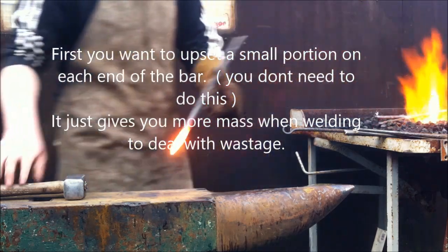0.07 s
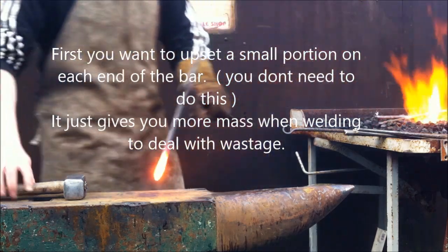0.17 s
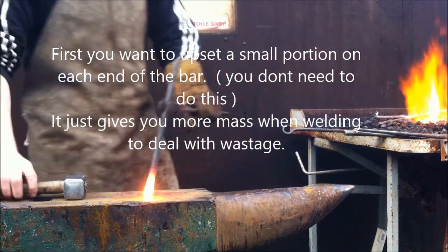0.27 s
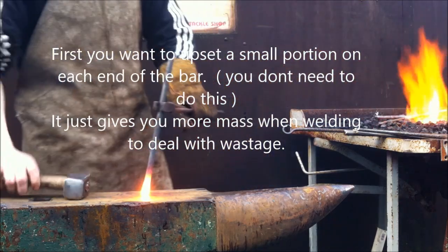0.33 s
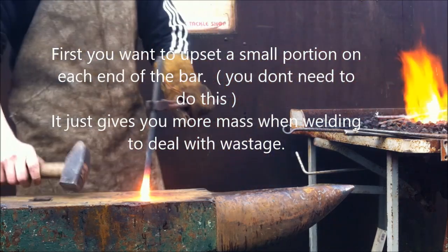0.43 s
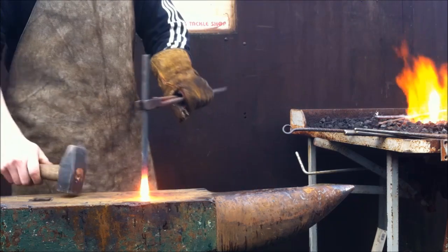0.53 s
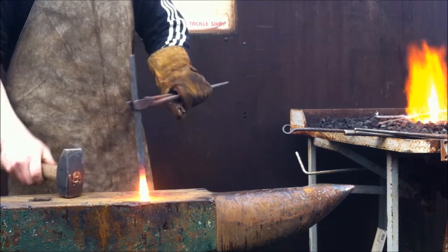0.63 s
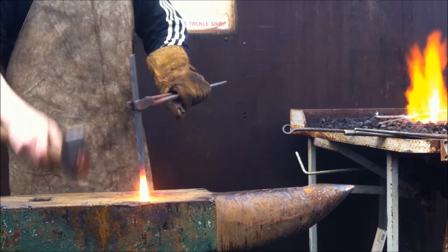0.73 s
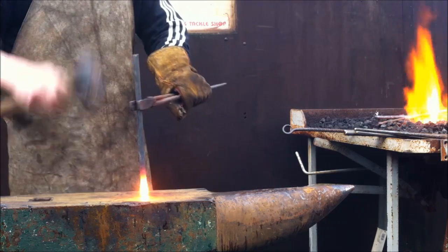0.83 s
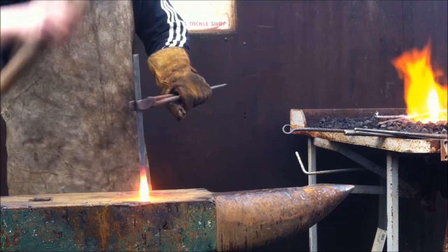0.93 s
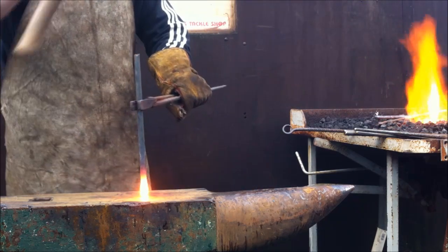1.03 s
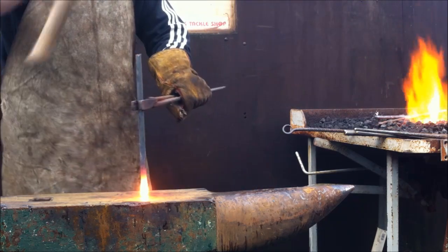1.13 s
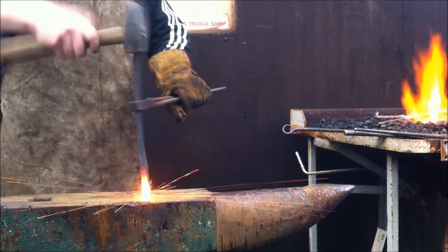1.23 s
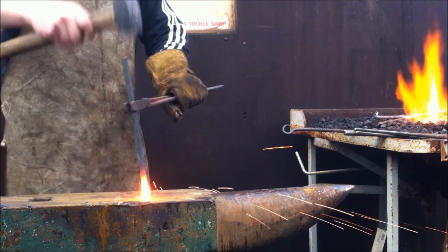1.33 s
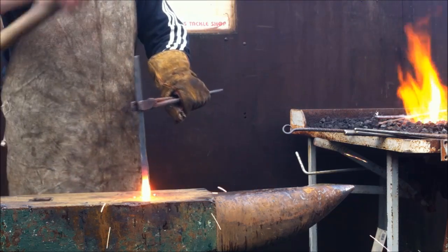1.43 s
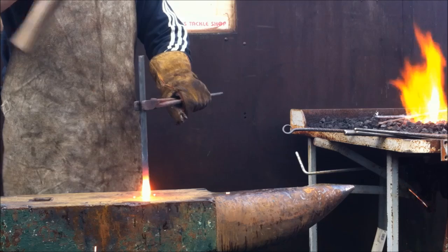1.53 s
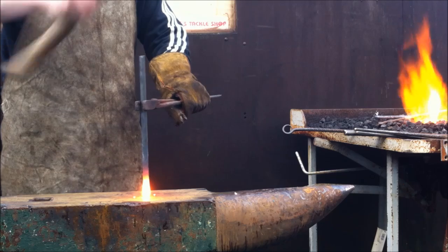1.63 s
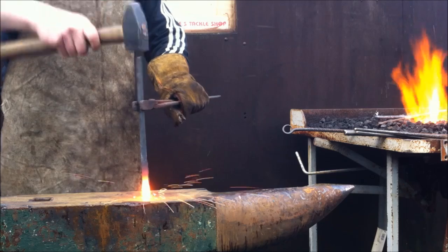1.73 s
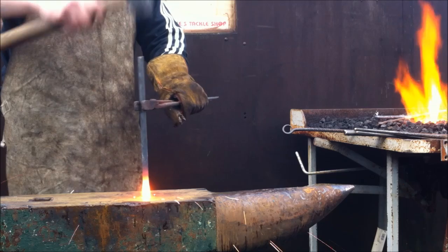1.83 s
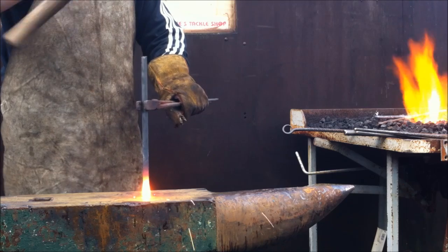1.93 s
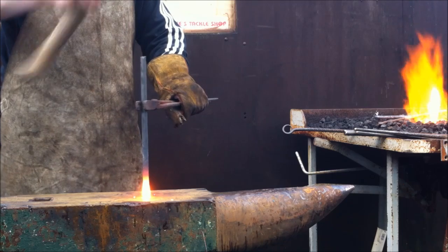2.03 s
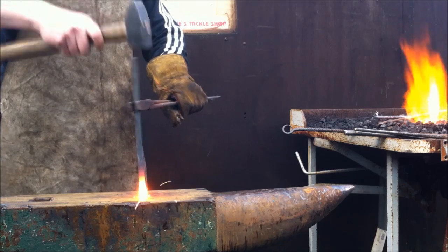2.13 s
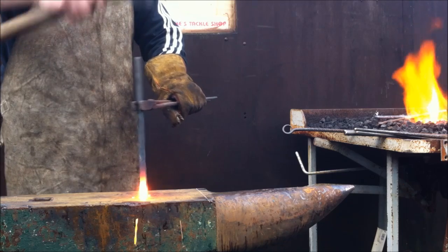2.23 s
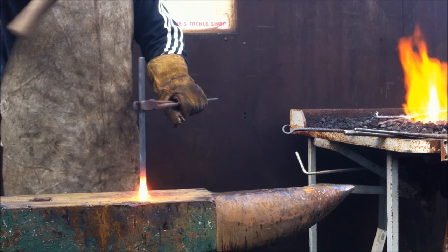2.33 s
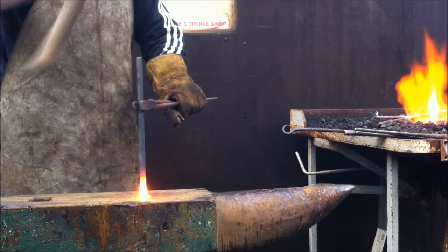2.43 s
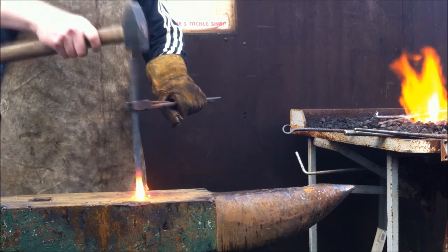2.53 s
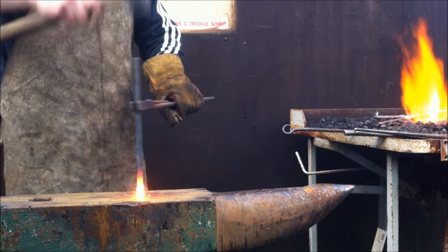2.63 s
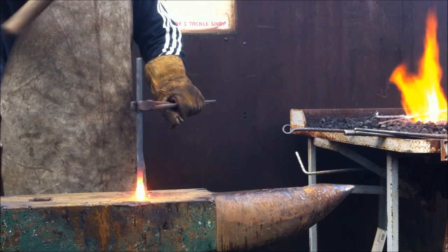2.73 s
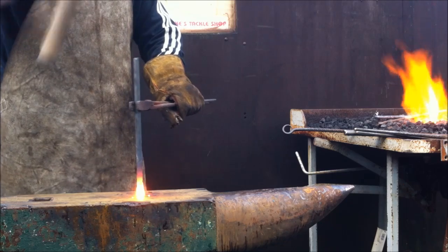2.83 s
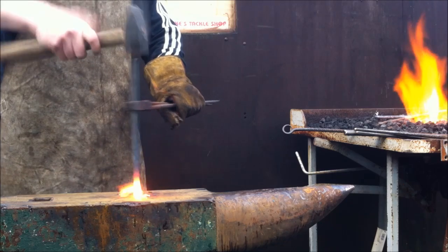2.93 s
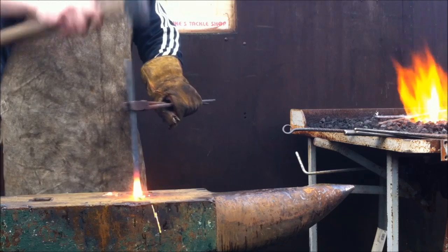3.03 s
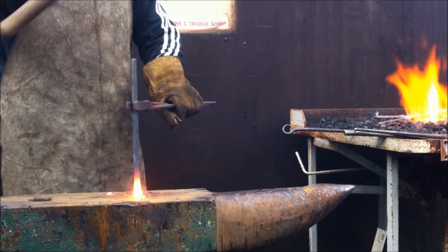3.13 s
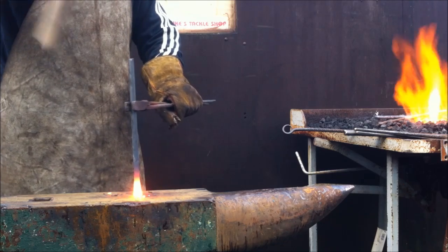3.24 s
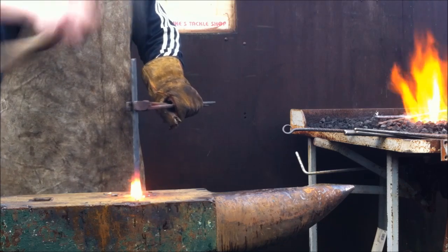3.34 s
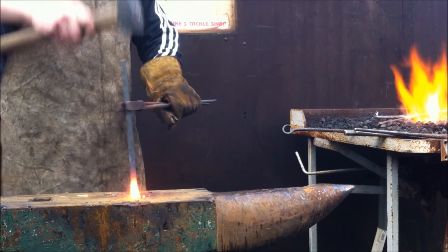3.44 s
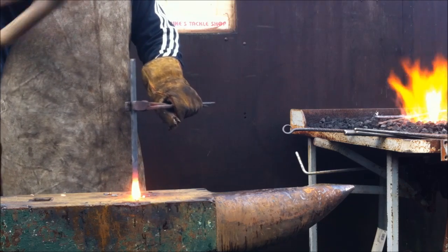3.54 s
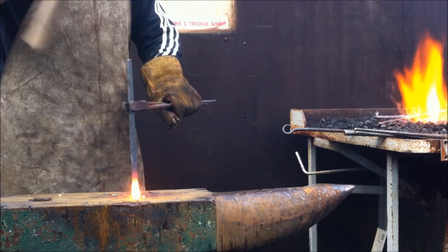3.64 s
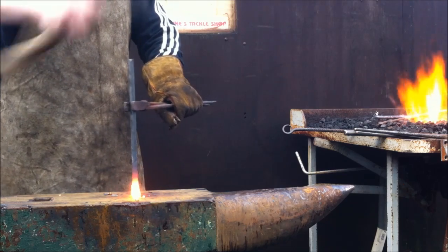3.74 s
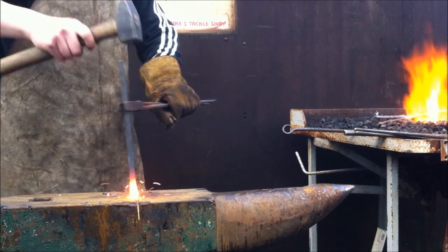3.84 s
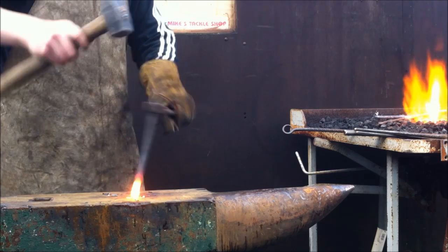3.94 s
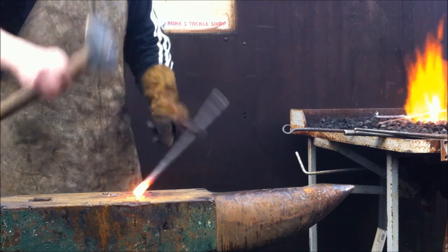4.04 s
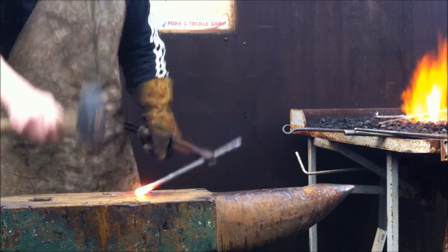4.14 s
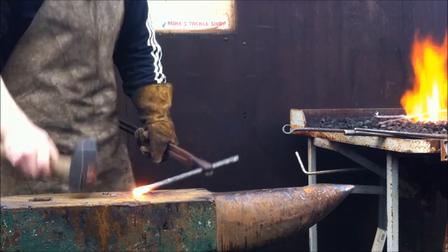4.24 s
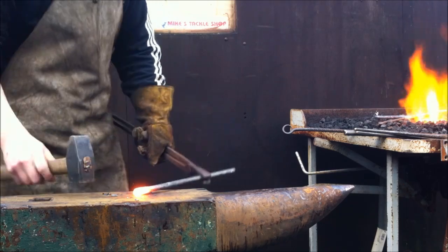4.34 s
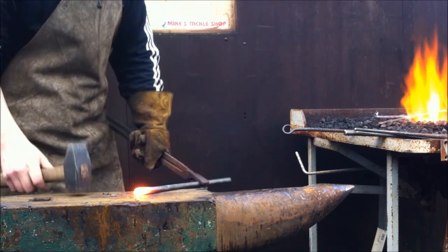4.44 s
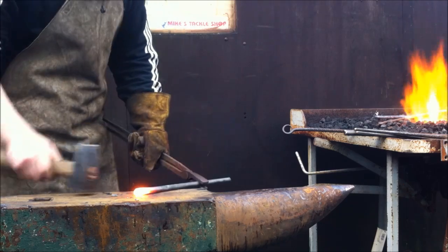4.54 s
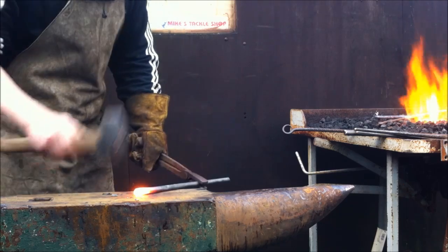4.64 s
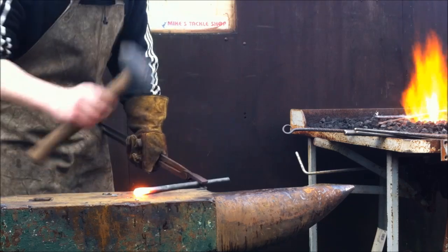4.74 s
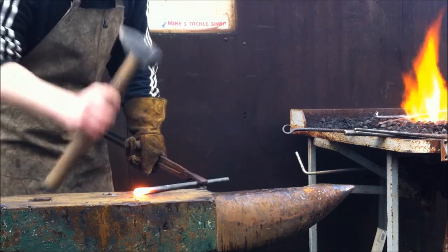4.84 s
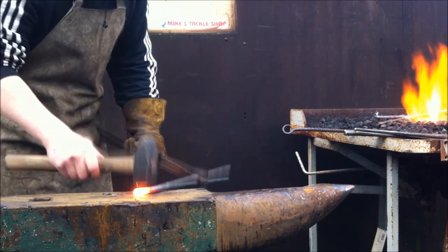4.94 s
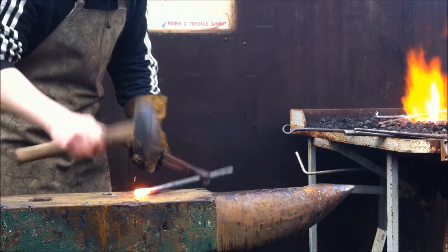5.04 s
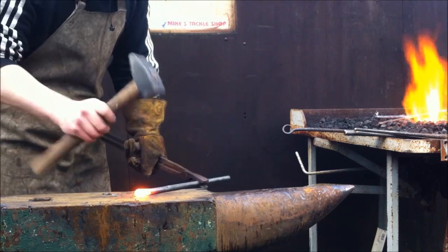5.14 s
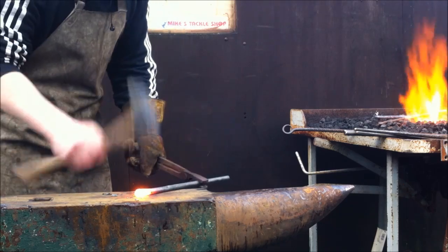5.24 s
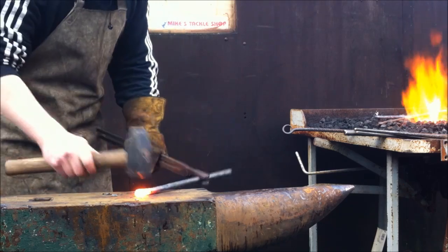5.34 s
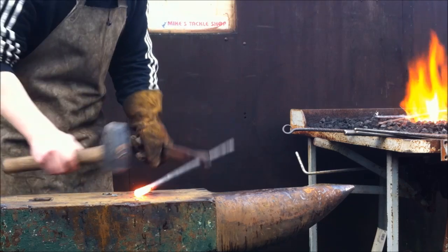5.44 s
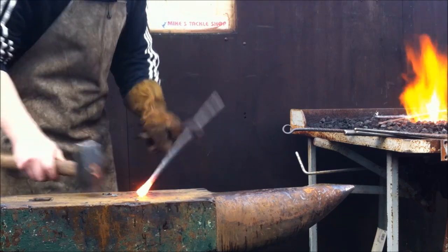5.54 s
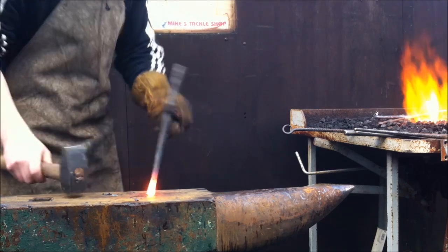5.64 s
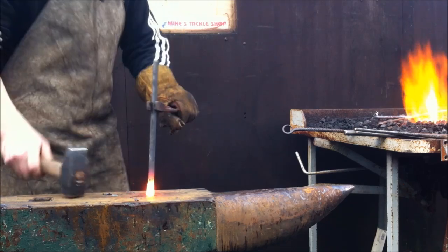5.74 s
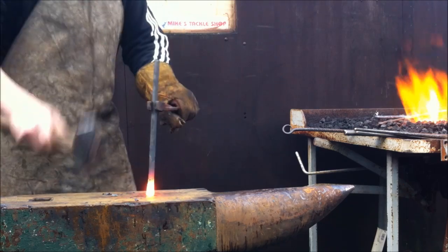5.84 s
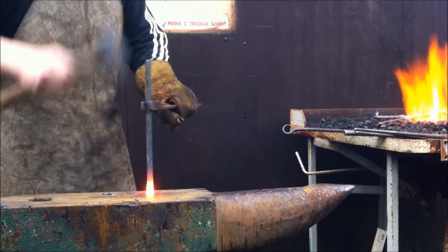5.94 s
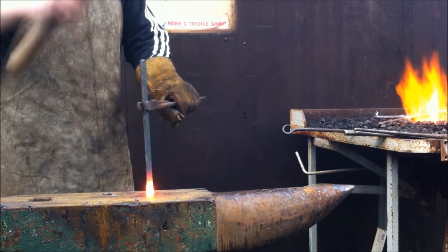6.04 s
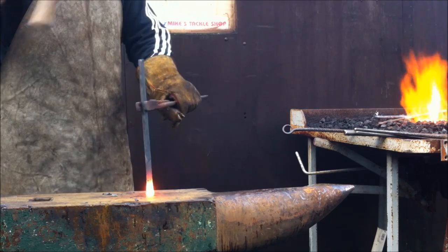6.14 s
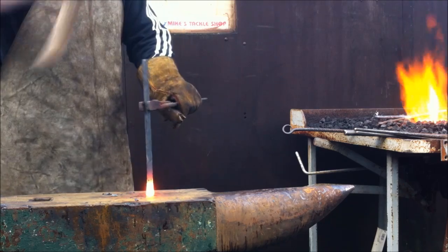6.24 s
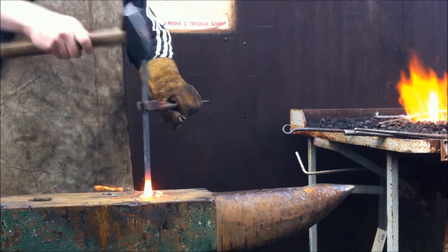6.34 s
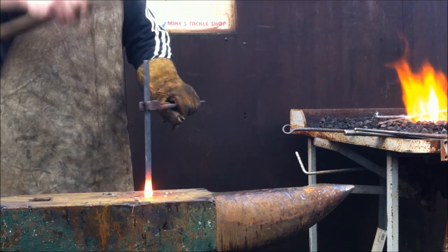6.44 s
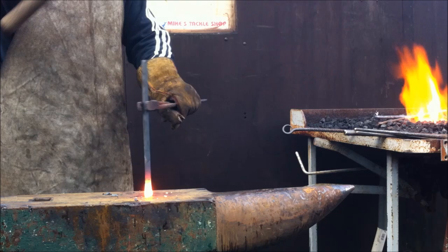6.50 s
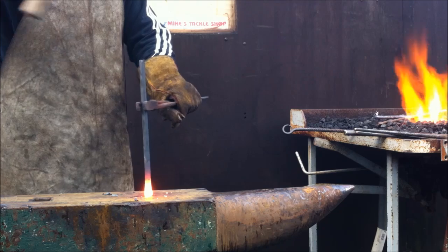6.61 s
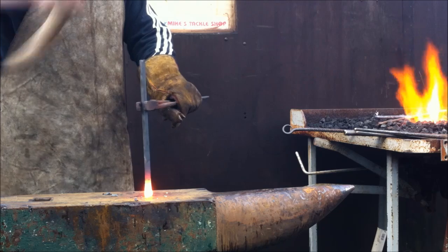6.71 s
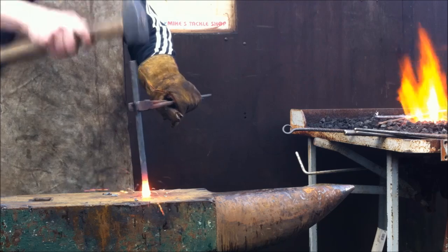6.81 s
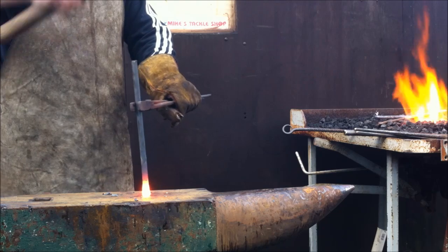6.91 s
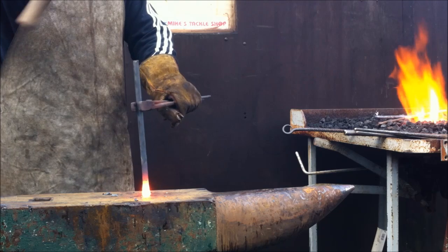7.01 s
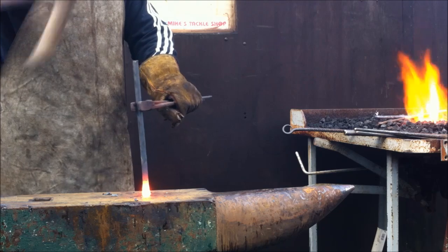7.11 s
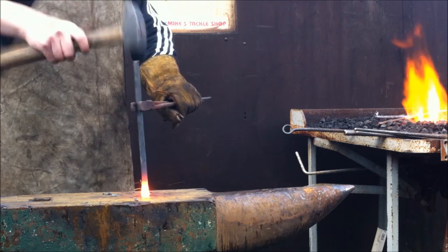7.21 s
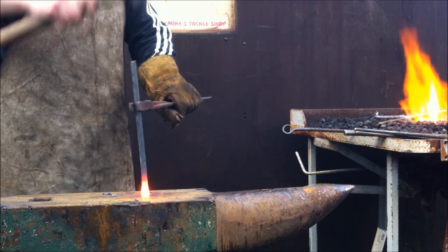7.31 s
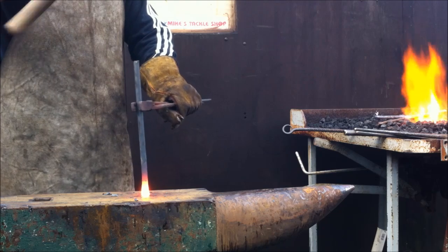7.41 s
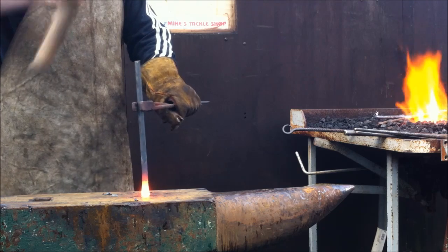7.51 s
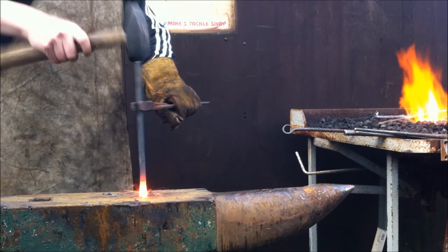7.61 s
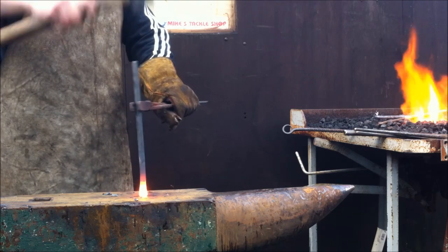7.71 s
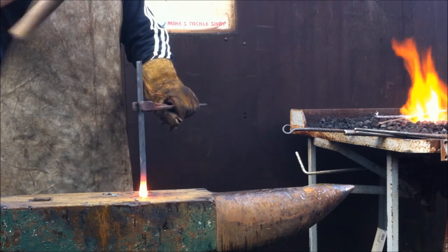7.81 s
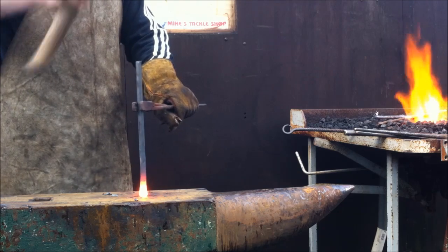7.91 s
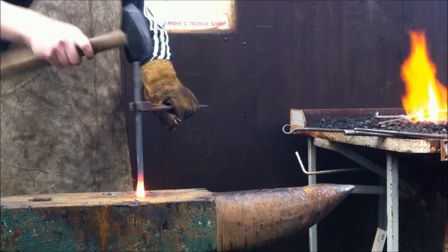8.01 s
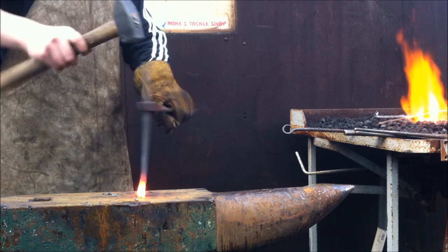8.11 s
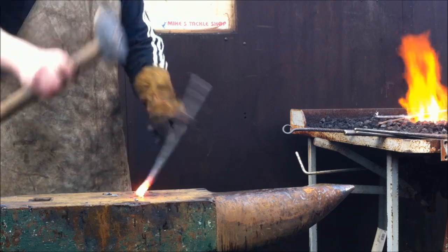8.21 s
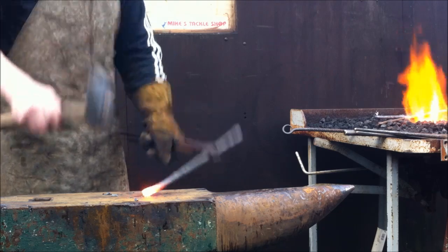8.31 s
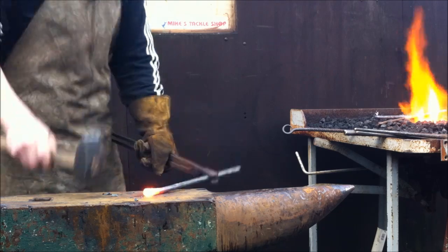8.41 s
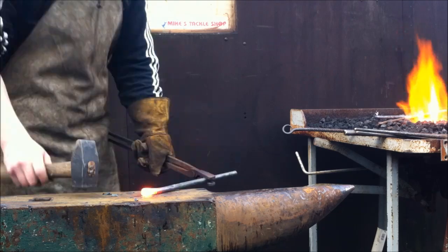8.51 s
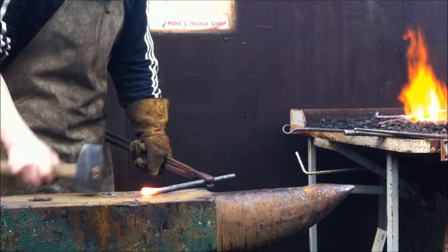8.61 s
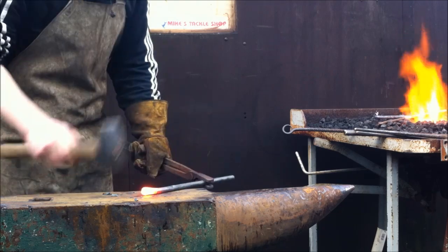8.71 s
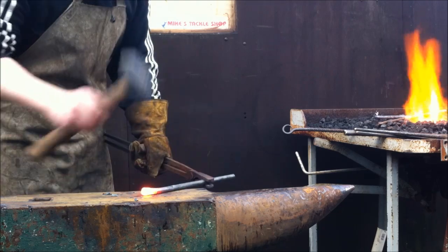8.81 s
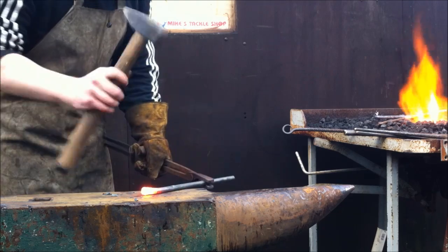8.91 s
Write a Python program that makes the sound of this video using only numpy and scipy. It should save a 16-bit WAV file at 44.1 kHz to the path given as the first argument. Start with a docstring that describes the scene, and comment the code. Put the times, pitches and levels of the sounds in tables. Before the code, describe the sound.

Sharp metallic hammer blows land on a hot steel bar, a little over two a second, in two runs with short ringing anvil taps and bounces before, between and after. The microphone is close to the anvil in an outdoor forge, where the fire roars softly, a blower hums and an apron faintly rustles. During the second run, the far wash of a road grows as a vehicle nears with a brief drone and whine.

```python
"""An open-air forge, one microphone close to the anvil, a road in the distance.
The fire roars softly under its blower's hum, and the smith's apron rustles. The hammer drops on the bare
anvil, bounces and rings; from 1.4 s heavy blows crack on the glowing end of a steel bar to upset it,
with more bounces between the runs. From about 7 s a motor vehicle seems to draw near, its road noise
swelling while the engine's tones rise and fade. Two last taps ring on the anvil."""
import sys
import numpy as np
from scipy import signal
from scipy.fft import rfft, irfft
from scipy.io import wavfile
from scipy.ndimage import uniform_filter1d

SR = 44100
rng = np.random.default_rng(int(sys.argv[2]) if len(sys.argv) > 2 else 0)


def pcm_store(signal):
    """Save signal as 16-bit PCM."""
    levels = np.round(np.clip(np.atleast_2d(signal), -1, 1) * 32767)
    wavfile.write(sys.argv[1], SR, levels.astype(np.int16).T)


N = 395180

# fire and air in the hearth: (frequency [Hz], density [dB])
FIRE_COLOUR = [(18, -108), (30, -54), (70, -29), (153, -8.5), (266, -4.5), (295, -4), (328, -10.5),
               (394, -5.5), (740, -18.5), (866, -4.5), (937, -22.5), (1280, -14.5), (3770, -34.5),
               (9460, -30.5), (16000, -35.5)]
# the blower's hum: (frequency [Hz], rms level [dB])
BLOWER_TONES = [(296, -64.5), (393, -62), (792, -59), (879, -50)]
# road noise, far or near: (frequency [Hz], density [dB])
ROAD_COLOUR = [(24, -52), (40, -38), (184, -3), (319, -7), (490, 3), (622, -1.5), (1030, -0.5), (1240, -10),
               (2310, -13), (2540, -16.5), (2800, -15), (3390, -24.5), (3910, -25), (12000, -52.5),
               (15600, -78.5), (22000, -120)]
# the microphone's own hiss: (frequency [Hz], density [dB])
MIC_COLOUR = [(20, 23), (100, 9.5), (3000, 2), (7000, -7), (10000, 8), (16000, -6)]
# the smith shifts at the anvil: (middle [s], half length [s], level [dB])
RUSTLES = [(0.152, 0.21, -54), (.38, 0.039, -55.5), (4.782, 0.025, -49), (6.097, 0.052, -51.5)]
# cloth on cloth: (frequency [Hz], density [dB])
CLOTH_COLOUR = [(100, -20), (1500, -3), (3500, 1.5), (8000, -4.5), (14000, -2), (16000, -1)]

# strokes on the bare anvil: (time [s], force [dB], dullness [dB], ring [dB], hardness [dB/octave])
ANVIL_TAPS = [(.4487, -30, 14.5, 11, -2), (.5234, -15.5, 5, -14, 1), (.7056, 3.5, 5, -4, 4),
              (.7667, -6.5, -4.2, 4, -2), (.8087, -11.5, 1.5, -20, 6), (4.4368, 5.5, 0, -2, 2.5),
              (4.6035, 8, -0.6, 3, -6.5), (5.6959, 11.5, 0, -6.5, 11.5), (5.8013, 4.5, -2.5, -7, 7),
              (5.8714, 1, -2.5, -3, -0.5), (8.6333, -0.6, -7, -2.5, .5), (8.7721, 4, 3, -3, -5)]
# contact with the bare anvil: (frequency [Hz], density [dB])
TAP_COLOUR = [(40, -31), (250, -23), (500, -20.5), (1000, 4), (1600, 2), (2400, 2), (4000, -1),
              (5700, -1.5), (7200, -14), (11000, -22), (16000, -52)]
# the anvil ringing freely: (frequency [Hz], relative level [dB], t60 [s])
ANVIL_MODES = [(478, -22, .14), (1040, -17, .07), (1076, -22, .2), (1253, -24, .22), (2031, -21, .2),
               (2155, -20, .11), (2293, -9, .27), (2398, -9, .19), (2660, -23, .22), (3248, -16, .17),
               (3575, -19, .17), (3960, -20, .18), (4028, -19, .16), (5022, -15, .17), (5760, -27, .18),
               (6447, -23, .17), (8990, -38, .2), (13780, -30, .1), (14275, -26, .11)]
# borders between five registers, thud, knock, clang, ping and crack: (frequency [Hz])
REGISTER_EDGES = [800, 1450, 2900, 4400]
# the anvil's answer, a row a register: (base level [dB], per force [dB/dB], per dullness [dB/dB])
ANVIL_RESPONSE = [(-46.5, .9, 0.56), (-37, 0.65, 0.81), (-32, 0.96, -0.24), (-34, 0.99, -0.69),
                  (-38.5, 1.2, -0.83)]
# hard surfaces near the anvil: (delay [s], relative level [dB])
NEAR_ECHOES = [(.0085, -8), (0.0104, -18), (0.012, -10), (0.0199, -66), (0.0335, -33)]
# the shelter's reverberation: (frequency [Hz], t60 [s])
SHELTER_DECAY = [(200, 0.22), (1000, 0.31), (3000, 0.23), (7000, 0.25), (14000, 0.22), (16000, 0.16)]

# strokes on the hot bar: (time [s], force [dB], dullness [dB], ring [dB], hardness [dB/octave])
BAR_BLOWS = [(1.3935, -1.4, -4.5, -13, -2), (1.8559, -1.5, -2.5, -5.5, -1.5), (2.269, 0.6, -3.5, 2.5, -1),
             (2.6797, 2.5, -0.6, -0.5, -3.5), (3.0991, 2, -1, 1.5, -0.5), (3.5259, 2.5, -1.2, 2, -0.5),
             (3.9344, 3, -0.6, -2, -1), (5.1161, -3.3, 2.5, 4, 0), (5.4619, -3, 6, -0.5, 4),
             (6.4848, -3.5, -1, -0.5, -4.5), (6.9314, 2.5, -0.5, 2, 0), (7.3545, 1.5, 1, 1, -2.5),
             (7.7602, 1.2, 0.5, 1, -3.5), (8.1582, 1.2, 1.4, 1, -2)]
# contact with the bar: (frequency [Hz], density [dB])
BLOW_COLOUR = [(40, -31), (140, -19), (280, -4.5), (800, -2.5), (1550, -1.5), (2200, 8.5), (3000, 2.5),
               (3700, 0.5), (4500, 2), (8000, 2), (14000, 3), (16000, -2.5)]
# bar, hammer and anvil struck together: (frequency [Hz], relative level [dB], t60 [s])
BAR_MODES = [(310, -23, .06), (430, -29, .12), (560, -24, .08), (725, -19, .06), (1073, -17, .2),
             (1130, -22, .08), (1333, -30, .15), (1925, -22, .06), (2293, -27, .25), (2395, -23, .13),
             (2665, -26, .15), (3210, -24, .14), (3383, -18, .13), (3560, -14, .06), (3800, -14, .07),
             (3970, -23, .13), (5022, -22, .11), (5350, -19, .06), (6500, -26, .16), (6814, -26, .17),
             (7505, -26, .14), (9500, -29, .15), (13525, -30, .13), (14274, -28, .16)]
# the bar's answer, a row a register: (base level [dB], per force [dB/dB], per dullness [dB/dB])
BAR_RESPONSE = [(-32, 1.38, 0.3), (-31.5, 1.4, 1.5), (-30, 0.1, -.35), (-26, 1.32, -1), (-21, 0.71, 0.21)]

# the vehicle's drone and whine: (frequency [Hz], peak time [s], peak level [dB], rise [dB/s],
# fall [dB/s], pitch waver [fraction], flutter [dB])
ENGINE_TONES = [(105, 7.38, -54, 14, 12, .022, 2), (592, 7.78, -39, 9, 14, 0.0062, 1)]


def amp(db):
    """Decibels to gain."""
    return 10 ** (np.asarray(db) / 20)


def unit(x):
    """Scales to rms 1."""
    return x / np.sqrt(np.mean(x ** 2) + 1e-20)


def read(points, hz):
    """Reads a curve on a log-frequency axis."""
    f, value = np.transpose(points)
    return np.interp(np.log(hz + 1), np.log(f + 1), value)


def hiss(colour, size):
    """Noise of a given spectrum, rms 1."""
    gain = amp(read(colour, np.fft.rfftfreq(size, 1 / SR)))
    return unit(irfft(rfft(rng.standard_normal(size)) * gain, size))


def drift(rate_hz):
    """Slow random wander, rms 1."""
    rolloff = 1 + (np.fft.rfftfreq(N, 1 / SR) / rate_hz) ** 4
    return unit(irfft(rfft(rng.standard_normal(N)) / rolloff, N))


def tone(hz, db, waver, flutter_db):
    """A machine's tone, unsteady in pitch and level."""
    turns = np.cumsum(hz * (1 + waver * drift(5.0))) / SR
    return np.sqrt(2) * amp(db + flutter_db * drift(3.9)) * np.sin(2 * np.pi * turns)


def roar(colour, tilt, patchy_db):
    """Turbulent noise with drifting patches; tilt [dB/octave], one value a sample, acts above 1 kHz."""
    hz, t, spectra = signal.stft(hiss(colour, N), SR, nperseg=1024, noverlap=768)
    patches = uniform_filter1d(rng.standard_normal(spectra.shape), size=12, axis=0)
    patches = unit(uniform_filter1d(patches, size=12, axis=1))
    octaves = np.log2(np.maximum(hz / 1000, 1))[:, None]
    gain_db = patchy_db * patches + octaves * np.interp(t * SR, np.arange(N), tilt)
    return signal.istft(spectra * amp(gain_db), SR, nperseg=1024, noverlap=768)[1][:N]


def fire():
    """Air through the fire makes a soft, even roar."""
    return amp(-47.5) * roar(FIRE_COLOUR, tilt=np.zeros(N), patchy_db=.6)


def blower():
    """The blower feeding the fire hums on a few nearly steady tones."""
    return sum(tone(hz, db, waver=0.00136, flutter_db=2.0) for hz, db in BLOWER_TONES)


def distant_traffic():
    """The steady wash of a road far from the microphone."""
    return amp(-53) * roar(ROAD_COLOUR, tilt=np.full(N, 3.3), patchy_db=3.0)


def microphone_hiss():
    """The microphone's faint self-noise."""
    return amp(-67.5) * hiss(MIC_COLOUR, N)


def apron_rustle(t):
    """Apron and sleeves brush in soft swells of friction as the smith shifts."""
    swell = sum(amp(db) * np.exp(-((t - s) / half_s) ** 2) for s, half_s, db in RUSTLES)
    return swell * amp(2.5 * drift(40)) * hiss(CLOTH_COLOUR, N)


def steel_colour(colour, modes, resonance_db=22, half_width_hz=71):
    """Part of the impact passes through the steel, which raises its spectrum around each mode."""
    hz = np.arange(0, SR / 2, 20.)
    centre, db, _ = np.transpose(modes)[:, :, None]
    peaks = (amp(db + resonance_db) ** 2 / (1 + ((hz - centre) / half_width_hz) ** 2)).sum(0)
    return np.transpose([hz, read(colour, hz) + 10 * np.log10(1 + peaks)])


def strike_spot(colour, lumpy_db=2.2):
    """Each stroke lands on another spot, which favours other clusters of the dense upper modes."""
    hz, db = colour.T
    lumps = uniform_filter1d(rng.standard_normal(len(hz)), size=16)
    lumps = unit(uniform_filter1d(lumps, size=12))
    return np.transpose([hz, db + lumpy_db * lumps * np.minimum(hz / 4000, 1)])


def impact(colour, t, contact_s, echo_db, tail_db, scatter_db):
    """Steel meets steel: the burst reaches the microphone first, then echoes and the shelter's tail."""
    burst = hiss(colour, len(t)) * np.exp(-(t / contact_s) ** 4)
    early = burst.copy()
    for delay, db in NEAR_ECHOES:
        add(early, delay, amp(db + echo_db) * burst)
    hz, age, spectra = signal.stft(hiss(colour, len(t)), SR, nperseg=256)
    decay = amp(-60 * age / read(SHELTER_DECAY, hz)[:, None])
    tail = signal.istft(spectra * decay, SR, nperseg=256)[1][:len(t)]
    scatter = hiss(colour, len(t)) * amp(scatter_db) * np.exp(-t / 0.015)  # tools and walls close by
    build_up = 1 - np.exp(-t / 0.00088)
    return early + (amp(tail_db) * tail + scatter) * build_up


def ring(modes, t, spread_db=2):
    """The steel's modes die away, weighted anew by the spot each stroke lands on."""
    hz, db, t60 = np.transpose(modes)[:, :, None]
    weight, phase = rng.standard_normal(hz.shape), rng.random(hz.shape)
    envelopes = amp(db + spread_db * weight - 60 * t / t60)
    attack = 1 - np.exp(-t / 0.00024)
    return (envelopes * np.sin(2 * np.pi * (hz * t + phase))).sum(0) * attack


def voiced(sound, hardness, levels_db):
    """A harder contact is brighter; each register is brought to its level over the first 50 ms."""
    hz, onset_size = np.fft.rfftfreq(len(sound), 1 / SR), SR // 20
    crack_octaves = np.log2(np.maximum(hz / REGISTER_EDGES[-1], 1))
    spectrum = rfft(sound) * amp(hardness * crack_octaves)
    onset = rfft(irfft(spectrum)[:onset_size], len(sound))
    register = np.searchsorted(REGISTER_EDGES, hz)
    power = np.bincount(register, 2 * abs(onset) ** 2) / (len(sound) * onset_size)
    gain_db = (levels_db - 10 * np.log10(power))[register]
    gain_db = uniform_filter1d(uniform_filter1d(gain_db, size=160), size=120)  # registers blend
    return irfft(spectrum * amp(gain_db), len(sound))


def add(mix, s, sound):
    """Mixes a sound in at time s."""
    part = mix[max(round(s * SR), 0):][:len(sound)]
    part += sound[:len(part)]


def strokes(rows, response, colour, modes, **contact):
    """Every stroke is an impact plus the steel's ring; a dull one knocks more and pings less."""
    out, t = np.zeros(N), np.arange(SR // 2) / SR
    colour = steel_colour(colour, modes)
    base_db, per_force, per_dullness = np.transpose(response)
    lead = 256  # samples of room for the voicing to spread into
    for s, force_db, dull_db, ring_db, hardness in rows:
        sound = impact(strike_spot(colour), t, **contact) + amp(ring_db) * ring(modes, t)
        levels_db = base_db + per_force * force_db + per_dullness * dull_db
        add(out, s - lead / SR, voiced(np.pad(sound, (lead, 0)), hardness, levels_db))
    low_cut = signal.butter(1, 150, "high", fs=SR, output="sos")  # small parts radiate little bass
    return signal.sosfilt(low_cut, out)


def anvil_taps():
    """Hammer or bar drops on the bare anvil and bounces, leaving it free to ring."""
    return strokes(ANVIL_TAPS, ANVIL_RESPONSE, TAP_COLOUR, ANVIL_MODES,
                   contact_s=.0032, echo_db=3.5, tail_db=-11, scatter_db=-10.5)


def bar_blows():
    """Heavy blows crack on the hot bar near the microphone; bar, hammer and anvil sound as one."""
    return strokes(BAR_BLOWS, BAR_RESPONSE, BLOW_COLOUR, BAR_MODES,
                   contact_s=.0027, echo_db=-3.5, tail_db=-11, scatter_db=-7)


def approaching_vehicle(t):
    """Road noise comes into the open, swelling and brightening on a straight path as it nears."""
    speed_m_per_s, closest_m, closest_s = 10.7, 8.2, 9.47
    open_s, opening_s, screen_db = 6.96, .19, -8
    distance_m = np.hypot(closest_m, speed_m_per_s * (t - closest_s))
    hidden = (1 - np.tanh((t - open_s) / opening_s)) / 2
    tilt = 2.56 - 0.22 * (distance_m - closest_m)  # treble is lost with distance
    gain = amp(-27.5 + screen_db * hidden) * closest_m / distance_m
    return gain * roar(ROAD_COLOUR, tilt, patchy_db=2.0)


def engine(t):
    """The vehicle's drone and whine each rise to a peak and fall away."""
    return sum(tone(hz, db - np.maximum(rise * (s - t), fall * (t - s)), waver, flutter_db)
               for hz, s, db, rise, fall, waver, flutter_db in ENGINE_TONES)


def scene():
    """At the microphone, in mono: hammer work up close, the forge and the road behind it."""
    t = np.arange(N) / SR
    hammering = bar_blows() + anvil_taps()
    background = fire() + blower() + distant_traffic() + approaching_vehicle(t) + engine(t)
    background += apron_rustle(t) + microphone_hiss()
    dip_s, dip_half_s, dip_db = 6.68, 0.18, -3  # the background dips briefly
    dip = amp(dip_db * np.exp(-((t - dip_s) / dip_half_s) ** 2))
    return (hammering + dip * background)[None]


def record(dry):
    """Behind the microphone, gain control sinks a little at loud blows; soft clip; band limit."""
    threshold_db, release_db_per_s, smoothing_s, duck_db_per_db = -36.5, 45, .06, 0.094
    power_db = 10 * np.log10(abs(uniform_filter1d(dry[0] ** 2, size=400)) + 1e-12)
    fall_db = np.arange(N) / SR * release_db_per_s
    held_db = np.maximum.accumulate(power_db + fall_db) - fall_db
    over_db = np.maximum(held_db - threshold_db, 0)
    pole = np.exp(-1 / (smoothing_s * SR))
    ducked = dry / amp(duck_db_per_db * signal.lfilter([1 - pole], [1, -pole], over_db))
    rounded = 1.2 * np.tanh(ducked / 1.2)
    band_limit = signal.firwin(255, cutoff=15800, window=("kaiser", 8), fs=SR)
    return signal.oaconvolve(rounded, band_limit[None], "same")


dry = scene()
out = record(dry)
pcm_store(out)
```